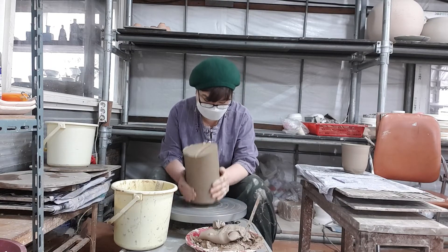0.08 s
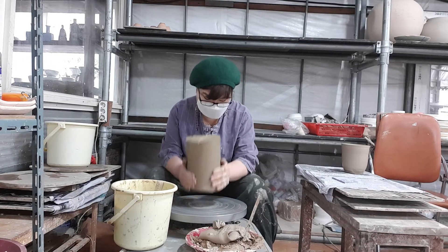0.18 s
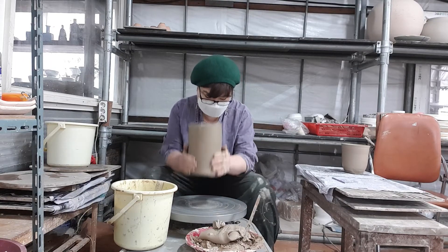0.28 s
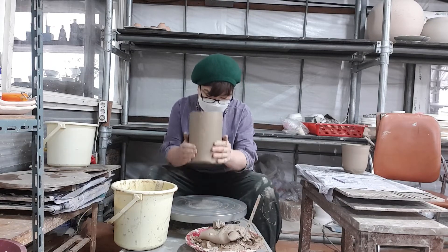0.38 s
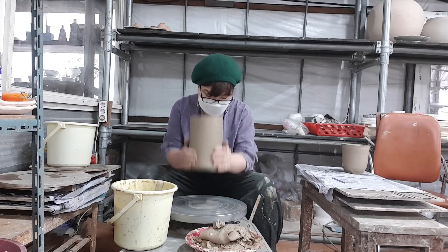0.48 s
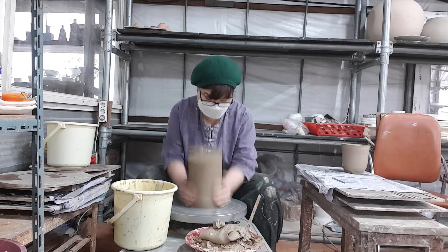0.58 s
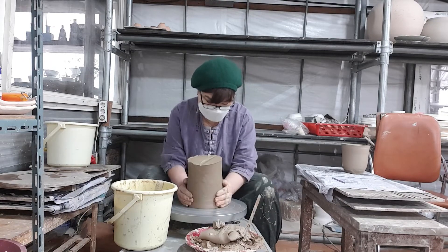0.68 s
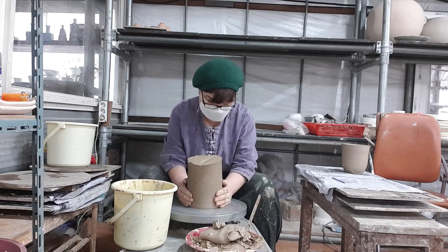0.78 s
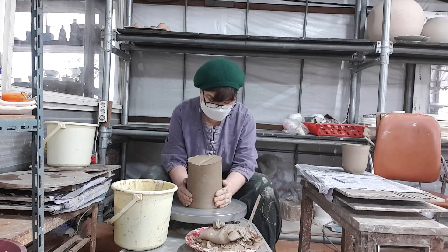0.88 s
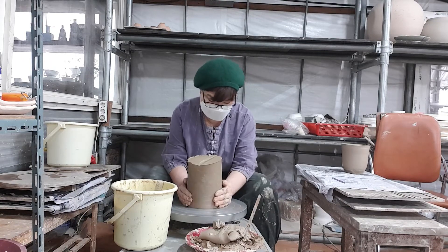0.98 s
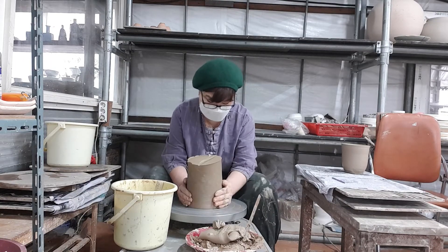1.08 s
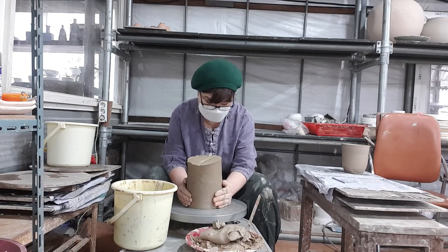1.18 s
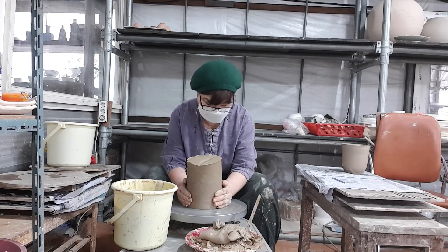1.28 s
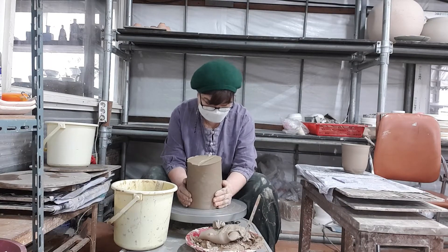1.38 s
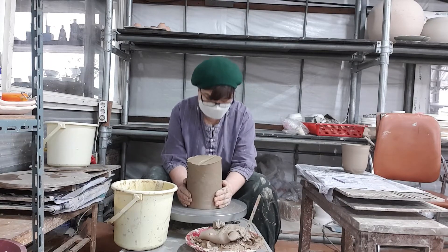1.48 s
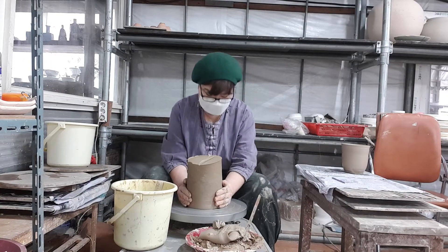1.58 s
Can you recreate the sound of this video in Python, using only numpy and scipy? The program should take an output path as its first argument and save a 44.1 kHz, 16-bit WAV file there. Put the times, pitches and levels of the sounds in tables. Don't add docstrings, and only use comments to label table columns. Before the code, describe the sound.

A single hard slam of wet clay on a metal wheel head at about 0.64 s, slightly right. Very faint sticky smacks come at 0.04-0.06 s as the clay peels off, then quiet. The slam is a sudden dull slap with a bright crack, damped metal knock and low frame thud; a short, bright room tail fades by about 1.1 s. Low traffic, engine drone and faint hiss continue to 1.65 s.

```python
import sys
import numpy as np
from scipy import signal
from scipy.fft import rfft, irfft, next_fast_len
from scipy.io import wavfile
from scipy.ndimage import uniform_filter1d, map_coordinates

SR = 44100
rng = np.random.default_rng(int(sys.argv[2]) if len(sys.argv) > 2 else 0)


def ratio_of_db(decibels):
    return 10 ** (np.asarray(decibels, float) / 20)


def pcm_store(signal):
    levels = np.round(np.clip(np.atleast_2d(signal), -1, 1) * 32767)
    wavfile.write(sys.argv[1], SR, levels.astype(np.int16).T)


N = 72765

SLAM_S, SLAM_LEAN_DB = 0.6392, -3
# (time from slam [s], level [dB])
PUSHES = [
    (-.0013, -14.5),
    (.0001, 6),
    (.0019, -19),
    (.004, -14),
    (.0071, -6),
]
# (time from slam [s], level [dB])
EDGE_TOUCHES = [
    (-.021, -28),
    (-.019, -27),
]
# (frequency [Hz], level [dB/Hz])
PUSH_SPECTRUM = [(150, -18), (650, -3), (1000, -0.5), (1300, -10.5), (1750, 5.5), (2400, -17.5),
                 (3200, -11.5), (4500, -28), (16000, -52)]
# (time from slam [s], level [dB], T60 [s])
CRACK_STAGES = [
    (-.0014, -37, .004),
    (-.0001, -7.5, 0.0059),
    (.0018, -21, 0.026),
    (.006, -32.5, 0.05),
]
# (frequency [Hz], level [dB/Hz])
CRACK_SPECTRUM = [(600, -7), (1800, 2), (3200, -6.5), (5800, -10.5), (7200, -15), (8900, -1), (10500, -13),
                  (13500, -10.5), (16500, -29.5)]
# (frequency [Hz], level [dB], T60 [s])
HIGH_RING_MODES = [(9050, -15, .005), (13000, -24.5, 0.0028)]
# (frequency [Hz], level [dB], T60 [s])
HEAD_MODES = [(336, -33, 0.033), (434, -8.5, .04), (692, -24, 0.08), (965, -31, 0.077),
              (1820, -22.5, 0.036), (2014, -31, 0.18)]
RIM_MODE_HZ = [502, 630.5, 1545, 2152, 2795, 2934]
# (level [dB], T60 [s])
RIM_DECAYS = [(-22, 0.34), (-36.5, 0.45), (-42, 0.3), (-41, .2), (-43.5, 0.52), (-41.5, 0.23)]
# (frequency [Hz], level [dB], T60 [s])
FRAME_MODES = [(71, -28.5, 0.16), (108.2, -23.5, 0.27), (117.5, -11.5, 0.078), (135.2, -14, 0.16),
               (160, -39, 0.029), (221.3, -30, 0.3)]
# (time [s], peak [dB], rise [s], T60 [s])
WET_CONTACTS = [
    (0.043, -56, 0.0036, 0.18),
    (.0555, -45.5, 0.00071, 0.026),
    (0.063, -52.5, 0.0044, .06),
    (1.021, -67, 0.0018, 0.045),
]
# (frequency [Hz], level [dB/Hz])
SMACK_SPECTRUM = [(1500, -52), (2800, -14), (4500, -23.5), (6200, -16.5), (7600, -21), (8900, -4.5),
                  (10200, -7.5), (12500, -19.5), (16000, -17.5)]
# (frequency [Hz], T60 [s])
ROOM_T60 = [(150, 0.63), (1000, 0.21), (3000, 0.56), (6000, 0.63), (9000, 0.48), (15000, 0.34)]
# (frequency [Hz], level [dB/Hz])
ROOM_SEND_SPECTRUM = [(400, -26.5), (700, -0.5), (2000, -1.5), (2500, -11.5), (5500, -16), (7600, -16.5),
                      (9100, -9), (10800, -15.5), (15500, -21.5)]
# (frequency [Hz], level [dB/Hz])
EARLIER_SPECTRUM = [(2060, -52), (3500, -17), (4570, -17), (5780, -17), (8690, -1.5), (11100, 4.5),
                    (16000, -16)]
# (time [s], frequency [Hz], level [dB])
ENGINE_TRACKS = [
    [(0.0, 69.6, -38), (0.064, 65.4, -41), (0.102, 58.9, -41), (0.194, 47.1, -36), (0.3, 51.2, -33.5),
     (0.342, 53.6, -53), (0.424, 50.4, -32.5), (0.472, 50.6, -62), (0.6, 53, -45)],
    [(0.76, 67.63, -35), (0.846, 70.44, -52.5), (0.968, 69.4, -39), (1.036, 64.2, -77),
     (1.064, 65.6, -34.5), (1.232, 67.9, -43), (1.254, 69.44, -38), (1.548, 65.9, -39.5), (1.65, 70, -40.5)],
]
# (frequency [Hz], level [dB/Hz])
RUMBLE_SPECTRUM = [(20, -44), (32, -9), (47, -7), (66, -4), (92, -8.5), (140, -15), (199, -10.5),
                   (330, -26), (430, -69.5)]
# (time [s], rumble [dB])
LORRY_LEVEL = [
    (0, 0),
    (.45, 0),
    (.9, 1.5),
    (1.2, -3.5),
    (1.65, -1.5),
]
# (frequency [Hz], level [dB/Hz])
ROAR_SPECTRUM = [(150, -26.5), (260, -5), (399, -4), (659, -5.5), (717, -5), (989, -6.5), (1170, -7),
                 (2310, -20.5), (4500, -52.5), (5850, -80), (9900, -120)]
# (time [s], level [dB])
ROAR_LEVEL = [
    (0.0, -48),
    (0.334, -47.5),
    (0.62, -46.5),
    (0.872, -50),
    (1.268, -48.5),
    (1.65, -49),
]
# (frequency [Hz], width [Hz], rms [dB])
AIR_RESONANCES = [(88, 20, -52.5), (123.4, 6.9, -53), (187.9, 7.7, -53), (883.5, 210, -52.5)]
# (frequency [Hz], level [dB/Hz])
HISS_SPECTRUM = [(2500, -23.5), (3800, 1), (5500, -1.5), (7800, -15.5), (9500, -6), (12500, -0.5),
                 (15500, -7)]
# (frequency [Hz], left-right correlation [-1..1])
STEREO_LIKENESS = [(60, 0.94), (180, 0.99), (550, 0.54), (1650, -0.084), (4970, -0.71), (15000, -0.04)]
# (frequency [Hz], left over right [dB])
STEREO_LEAN = [(60, -3.0), (240, -2), (950, -3.0), (3770, -4.5), (15000, -1.5)]


def unit(x):
    return x / np.sqrt(np.mean(x ** 2) + 1e-20)


def along(points, hz):
    f, v = np.transpose(points)
    return np.interp(np.log(hz + 1), np.log(f + 1), v)


def curves(rows):
    s, *cols = np.transpose(rows)
    return [np.interp(np.arange(N) / SR, s, c) for c in cols]


def wobble(rate_hz):
    return map_coordinates(rng.standard_normal(400), [np.arange(N) * rate_hz / SR])


def lean(db):
    return ratio_of_db(np.array([[0.5], [-0.5]]) * db)


def causal(spectrum, x):
    gain = ratio_of_db(along(spectrum, np.fft.rfftfreq(4096, 1 / SR)))
    cepstrum = irfft(np.log(gain + 1e-5))
    cepstrum[1:2048] *= 2
    cepstrum[2049:] = 0
    h = irfft(np.exp(rfft(cepstrum)))
    return signal.fftconvolve(np.atleast_2d(x), h[None] / np.linalg.norm(h), axes=1)[:, :N]


def shaped(spectrum):
    return lambda hz: ratio_of_db(along(spectrum, hz))


def rush(gain, patchy_db):
    z = signal.stft(rng.standard_normal((2, N + 8192)), nperseg=512)[2]
    field = uniform_filter1d(rng.standard_normal(z.shape[1:]), size=5, axis=0)
    field = uniform_filter1d(field, size=12, axis=1)
    pair = signal.istft(z * ratio_of_db(patchy_db * unit(field)), nperseg=512)[1]
    hz = np.fft.rfftfreq(pair.shape[1], 1 / SR)
    turn = np.arccos(np.clip(along(STEREO_LIKENESS, hz), -1, 1)) / 2
    mid, side = rfft(pair) * gain(hz) * [np.cos(turn), np.sin(turn)]
    sides = np.array([mid + side, mid - side]) * lean(along(STEREO_LEAN, hz))
    return unit(irfft(sides)[:, :N])


def burst(start_s, db, rise_s, t60_s):
    t = np.clip(np.arange(N) / SR - start_s, 0, None)
    return ratio_of_db(db - 60 * t / t60_s) * (1 - np.exp(-t / rise_s))


def ringing(modes, start_s, rise_s):
    t = np.arange(N) / SR - start_s
    return sum(burst(start_s, db, rise_s, t60) * np.sin(2 * np.pi * hz * t) for hz, db, t60 in modes)


def push(rows, late_s):
    x = np.zeros(N)
    for s, db in rows:
        x[round((SLAM_S + s + late_s) * SR)] += ratio_of_db(db)
    return x


def slap():
    shared, left_late_s = 0.46, 0.0001
    noise = rng.standard_normal((3, N))
    pair = shared * noise[0] + np.sqrt(1 - shared ** 2) * noise[1:]
    crack = pair * sum(burst(SLAM_S + s, db, 0.00014, t60) for s, db, t60 in CRACK_STAGES)
    pulses = [*PUSHES, *EDGE_TOUCHES]
    air = [push(pulses, left_late_s), push(pulses, 0)]
    return causal(CRACK_SPECTRUM, crack) + causal(PUSH_SPECTRUM, air)


def high_ring():
    late_s, left_late_s = 0.0001, 0.00005
    return np.array([ringing(HIGH_RING_MODES, SLAM_S + late_s + s, 0.00014) for s in (left_late_s, 0)])


def wheel_head():
    rise_s = 0.0017
    rim = [(hz, db, t60) for hz, (db, t60) in zip(RIM_MODE_HZ, RIM_DECAYS)]
    return ringing(HEAD_MODES, SLAM_S, rise_s) - ringing(rim, SLAM_S, rise_s)


def frame():
    late_s, rise_s = 0.0052, 0.005
    return -ringing(FRAME_MODES, SLAM_S + late_s, rise_s)


def smacks():
    envelope = sum(burst(*contact) for contact in WET_CONTACTS)
    return causal(SMACK_SPECTRUM, rng.standard_normal(N) * envelope)[0]


def studio(x):
    late_s, gate_s = 0.003, 0.38
    hz, t, z = signal.stft(rng.standard_normal((2, SR)), SR, nperseg=256)
    fall_db = 60 * t / along(ROOM_T60, hz)[:, None] + 10 * (t / gate_s) ** 5
    tail = signal.istft(z * ratio_of_db(-fall_db), SR, nperseg=256)[1]
    late = np.pad(x, (round(late_s * SR), 0))[None]
    return signal.fftconvolve(late, tail / np.linalg.norm(tail[0]), axes=1)[:, :N]


def earlier_smack():
    level_db, t60_s = -60, 0.59
    fall = ratio_of_db(level_db - 60 * np.arange(N) / SR / t60_s)
    return fall * rush(shaped(EARLIER_SPECTRUM), patchy_db=0.5)


def engine():
    roughness, lean_db = 0.1, -3.5
    hz, level_db = curves(np.vstack(ENGINE_TRACKS))
    tone = np.sin(2 * np.pi * np.cumsum(hz) / SR)
    return np.sqrt(2) * ratio_of_db(level_db) * (1 + roughness * wobble(22)) * tone * lean(lean_db)


def traffic():
    rumble_db, roar_db = -42, -48.5
    lorry_db, = curves(LORRY_LEVEL)
    strength_db, = curves(ROAR_LEVEL)
    swell = ratio_of_db(strength_db - strength_db.mean())
    rumble = ratio_of_db(rumble_db + lorry_db) * rush(shaped(RUMBLE_SPECTRUM), patchy_db=-1.0)
    return rumble + ratio_of_db(roar_db) * swell * rush(shaped(ROAR_SPECTRUM), patchy_db=1.4)


def air_resonances():
    total = np.zeros((2, N))
    for centre_hz, width_hz, db in AIR_RESONANCES:
        peak = lambda hz: 1 / (1 + (2 * (hz - centre_hz) / width_hz) ** 2)
        total += ratio_of_db(db) * rush(peak, patchy_db=-1.6)
    return total


def hiss():
    return ratio_of_db(-79) * rush(shaped(HISS_SPECTRUM), patchy_db=1.5)


def below(x, top_hz):
    m = next_fast_len(N + SR // 4)
    gain = np.clip((top_hz - np.fft.rfftfreq(m, 1 / SR)) / 60, 0, 1)
    return irfft(rfft(x, m) * gain, m)[:, :N]


def scene():
    room_blow_db, room_body_db, room_smack_db = 4, -17.5, -1.5
    frame_lean_db, lasting_top_hz = -2.1, 15800
    wet, plate, thud = smacks(), wheel_head(), frame()
    blow = causal(ROOM_SEND_SPECTRUM, push([(0.00089, room_blow_db)], 0))[0]
    room = studio(ratio_of_db(room_smack_db) * wet + blow + ratio_of_db(room_body_db) * (plate + thud))
    near = (wet + plate + room) * lean(SLAM_LEAN_DB) + thud * lean(frame_lean_db)
    background = earlier_smack() + engine() + air_resonances() + traffic() + hiss()
    impact = (slap() + high_ring()) * lean(SLAM_LEAN_DB)
    return below(near + background, lasting_top_hz) + impact


def band_limit(x):
    return signal.sosfilt(signal.butter(12, 16650, fs=SR, output="sos"), x)


def record(dry):
    fade_s, top_hz = 0.004, 16600
    left_s = (N - np.arange(N)) / SR
    fade = np.sin(np.pi / 2 * np.clip(left_s / fade_s, 0, 1)) ** 2
    return band_limit(below(dry * fade, top_hz))


dry = scene()
out = record(dry)
pcm_store(out)
```